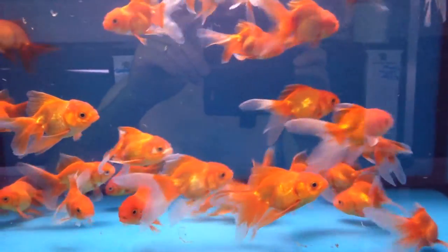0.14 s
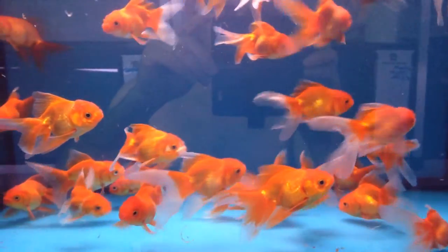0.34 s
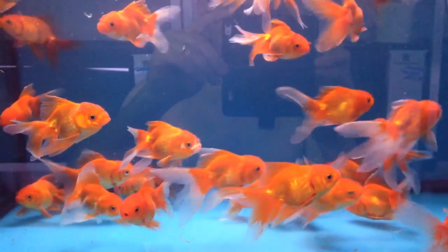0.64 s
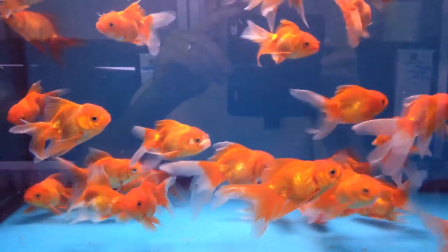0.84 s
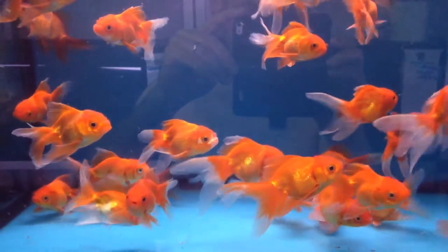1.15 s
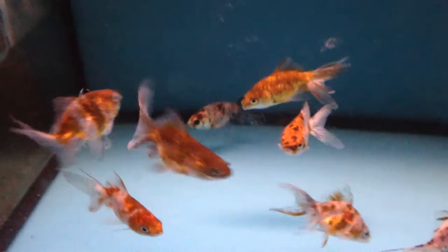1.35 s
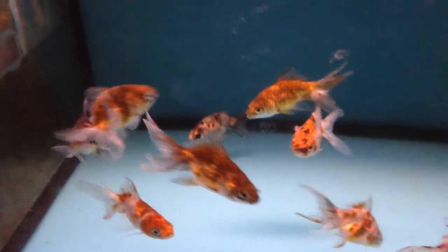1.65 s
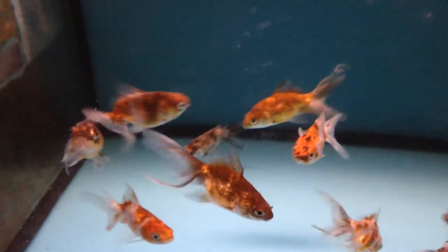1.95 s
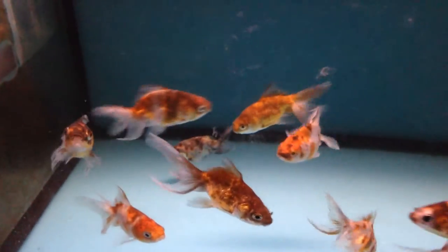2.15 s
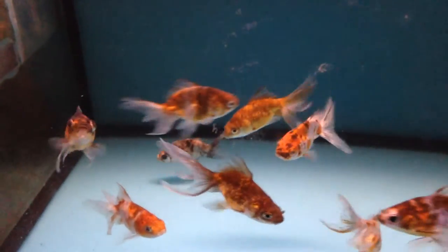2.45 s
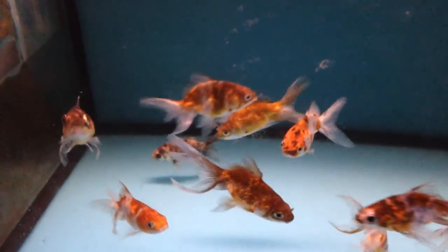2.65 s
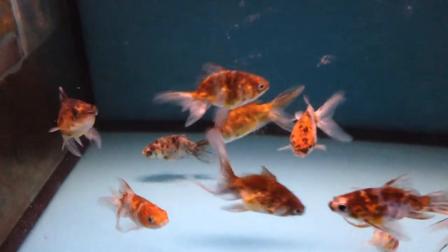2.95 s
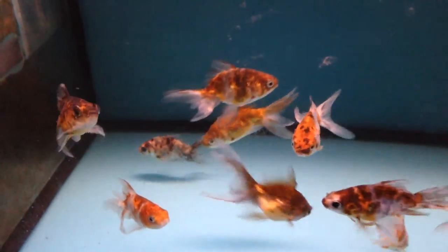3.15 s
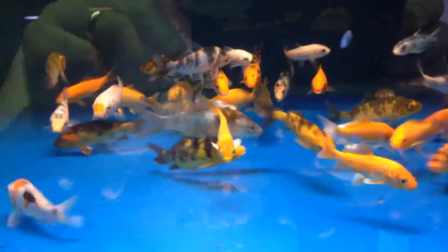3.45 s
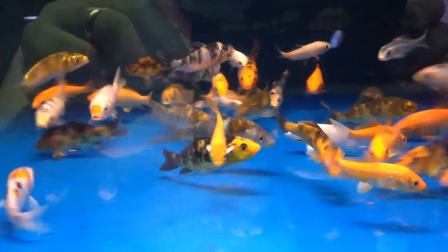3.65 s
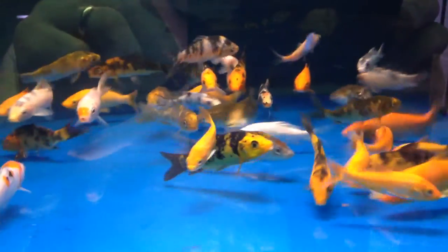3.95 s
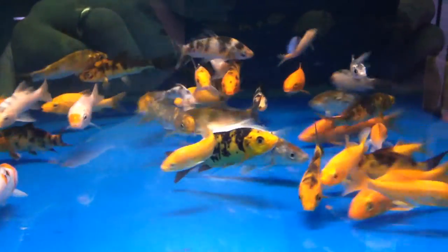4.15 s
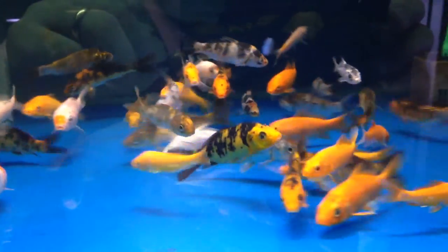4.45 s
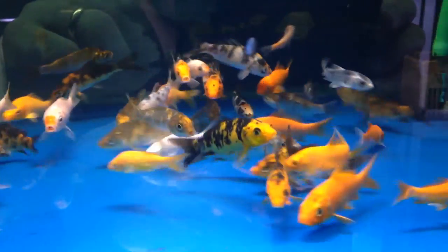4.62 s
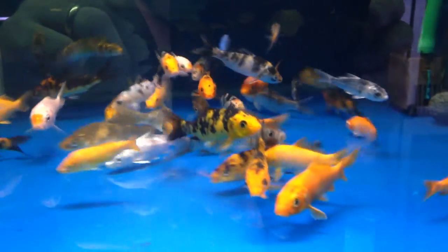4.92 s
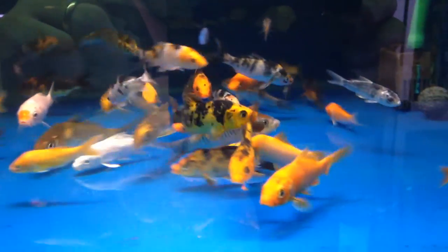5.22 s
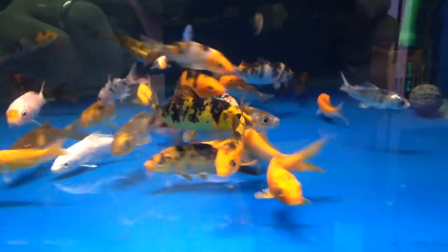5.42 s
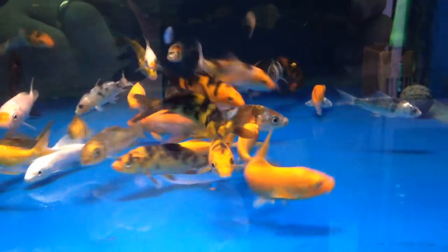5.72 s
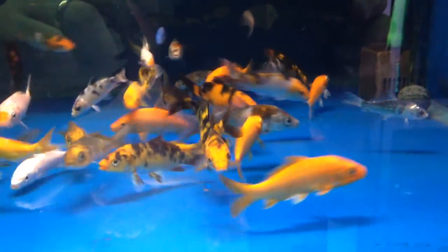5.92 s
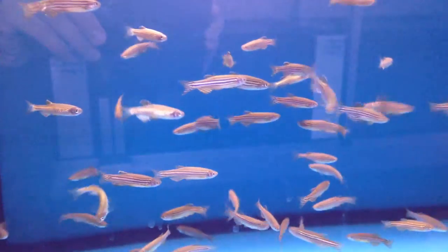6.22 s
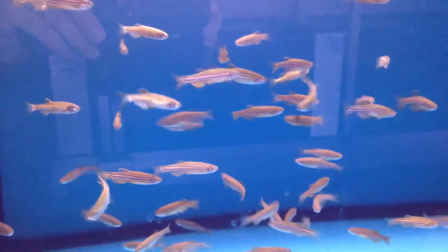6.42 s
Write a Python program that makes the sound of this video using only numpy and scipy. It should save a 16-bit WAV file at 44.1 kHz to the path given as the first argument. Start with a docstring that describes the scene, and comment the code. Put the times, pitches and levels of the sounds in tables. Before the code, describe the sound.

Steady electric hum of aquarium air pumps over rushing, gurgling, bubbling water, interrupted by three tiny silent gaps as the tank changes.

```python
"""Mains-driven air pumps hum at multiples of about 50 Hz, as sums of cosines, at four fish tanks.
The microphone listens to each tank in turn, with a short silence between them.
Behind the hum lie the wash of aerated water (coloured noise), gurgling bubbles and fizz (short
ringing tones), spray ticks and squeaks (filtered clicks and noise), and two outlet pipes (resonant
noise). At the third tank there is also a low wavering rumble of narrow noise."""
import sys
import numpy as np
from scipy import signal
from scipy.fft import rfft, irfft, next_fast_len
from scipy.io import wavfile
from scipy.ndimage import uniform_filter1d

SR = 44100
rng = np.random.default_rng(int(sys.argv[2]) if len(sys.argv) > 2 else 0)


def wrap_up_sound(samples):
    """Save the sound to the file named by the first command line argument, as 16-bit audio."""
    columns = np.atleast_2d(samples).T
    # keep every value between -1 and 1, then stretch to whole-number steps
    tamed = np.clip(columns, -1, 1)
    steps = np.round(tamed * 32767).astype(np.int16)
    wavfile.write(sys.argv[1], SR, steps)


N = 289911

# The tanks in listening order: start_s, end_s, mains_hz, stroke_delay_s, push_or_pull (+1 or -1)
TANK_VISITS = [(0, 1.328, 49.99, .002, 1), (1.3758, 3.4301, 50.0, 0, -1),
               (3.478, 5.9993, 50.006, .0179, -1), (6.0472, 6.6, 50.01, .0155, -1)]
# Pump harmonics, one list a tank: mains_multiple, level_db (rms)
PUMP_HARMONICS = [
    [(1, -67), (2, -50), (3, -57), (4, -49), (5, -55), (6, -56), (7, -68), (8, -61), (9, -75), (10, -73),
     (11, -62), (12, -72), (13, -70), (14, -68), (15, -70), (16, -70), (17, -68), (18, -67), (20, -72),
     (26, -64), (31, -73), (34, -72), (35, -68), (38, -71)],
    [(1, -68), (2, -47), (3, -53), (4, -55), (5, -56), (6, -60), (7, -65), (8, -68), (9, -64), (10, -69),
     (12, -73), (13, -72), (14, -75), (15, -69), (18, -65), (19, -72), (20, -73), (22, -71), (24, -71),
     (26, -67), (32, -75), (33, -71), (36, -71), (37, -74)],
    [(1, -67), (2, -64), (3, -55), (4, -54), (5, -55), (6, -58), (7, -72), (8, -64), (9, -69), (10, -56),
     (11, -71), (12, -71), (14, -72), (15, -70), (18, -72), (20, -62), (22, -70), (24, -71), (28, -73),
     (31, -73), (35, -71)],
    [(1, -69), (2, -52), (4, -56), (5, -63), (6, -53), (8, -62), (9, -62), (13, -67), (18, -66), (22, -67)],
]
# Spectrum of the wash of water and air, one list a tank: frequency_hz, density_db_per_hz
WASH_SPECTRA = [
    [(22, -95), (43, -84), (95, -82), (180, -78), (350, -84.5), (580, -86), (780, -81), (1500, -80.5),
     (2500, -83.5), (4200, -92.5), (6300, -100), (8500, -100), (12000, -103), (15000, -106)],
    [(22, -88), (43, -87), (80, -82), (150, -78), (350, -82.5), (600, -84.5), (800, -82), (1500, -82),
     (2500, -84), (4200, -94), (6300, -101), (8500, -104), (12000, -108), (15000, -111)],
    [(25, -100), (55, -74.5), (100, -85.5), (170, -77.5), (350, -83), (650, -86), (820, -81.5), (1500, -81),
     (2700, -84.5), (4600, -94.5), (5400, -96.5), (8500, -102), (12000, -104), (15000, -108)],
    [(22, -99), (43, -82), (95, -83), (190, -79), (400, -82.5), (580, -85), (800, -80.5), (1500, -81),
     (2500, -83.5), (4200, -93), (6300, -99), (8500, -101), (12000, -104), (15000, -109)],
]
# Course of the low rumble: time_s, level_db (rms), centre_hz
RUMBLE_COURSE = [(3.49, -58, 73.0), (3.59, -54.5, 76), (4.5, -61, 77), (4.62, -74, 71.4), (4.71, -54, 74),
                 (4.92, -55, 72.5), (5.18, -55, 81.5), (5.49, -55, 70.6), (5.64, -44, 74.8),
                 (5.69, -55, 74.6), (5.79, -50, 80.1), (5.99, -48, 80.1)]
# Spray ticks: start_s, snap_peak_db, low_edge_hz, high_edge_hz
SPRAY_TICKS = [(.1395, -41, 4600, 8660), (.4202, -45, 8000, 10500), (.511, -49, 8000, 9500),
               (.6008, -40, 7500, 10700), (.74, -51, 8000, 9200), (.795, -45, 12000, 15200),
               (.8742, -43, 7800, 15200), (.965, -50, 8000, 13000), (1.268, -52, 11500, 13000),
               (1.929, -48, 9000, 11000), (2.075, -54, 7600, 8800), (2.097, -54, 9500, 15200),
               (2.651, -52, 8000, 11000), (3.3865, -49, 7000, 11000), (3.75, -51, 9500, 11500),
               (4.782, -52, 8500, 11500), (5.337, -49, 9500, 13000), (5.368, -51, 9500, 13000)]
# Squeaky hisses: start_s, length_s, level_db (rms before the fades), start_hz, end_hz, width_hz
SPRAY_SQUEAKS = [(4.102, .035, -61.5, 8700, 7900, 800), (4.147, 0.041, -59, 7300, 7500, 700)]
# Near bubbles: start_s, peak_db (before the rise and decay), pitch_hz
NEAR_BUBBLES = [(1.876, -41, 1300), (2.04, -41, 1350), (2.095, -42, 2366), (2.445, -44, 1330),
                (2.652, -36, 1330), (3.011, -41, 1350), (3.391, -41, 1370), (3.71, -48, 2770),
                (4.346, -41.5, 2850), (4.523, -44, 2510), (4.572, -45, 1985), (5.093, -42, 2355),
                (6.412, -40, 1325)]
# Gurgling bubbles before the room tail: lowest_hz, highest_hz, rate_per_s, level_db (rms)
GURGLE = (650, 3385, 503, -58.5)
# Fizz of tiny bubbles before the room tail: lowest_hz, highest_hz, rate_per_s, level_db (rms)
FIZZ_BUBBLES = (6000, 14500, 16, -95)
# Air columns of the outlet pipes: resonance_hz, width_hz, level_db (rms)
OUTLET_PIPES = [(1325, 40, -63), (1485, 30, -65)]

EDGE_HZ = 15270  # upper limit of the recorded band
HUM_LAG_S, HUM_LAG_LASTS_S = .0032, .03  # after each silence the hum lags, then jumps ahead
PUFF_DB, PUFF_T60_CYCLES = -11, 390  # puff relative to its snap; decay in cycles of the low edge
GULP_RISE_S, GULP_T60_S = 0.0015, 0.094


def amp(db):
    """Level law: 20 dB is a factor of ten in amplitude."""
    return 10 ** (np.asarray(db) / 20)


def evened(x):
    """Normalization: division by the root mean square gives rms 1."""
    return x / np.sqrt(np.mean(x ** 2) + 1e-20)


def add(mix, s, sound):
    """Superposition: a sound is summed into the mix from time s, in place."""
    part = mix[round(s * SR):][:len(sound)]
    part += sound[:len(part)]


def resonate(x, hz, width):
    """Resonance by heterodyning: shift hz down to zero, smooth, and shift back, at gain 1."""
    turn = np.exp(2j * np.pi * np.cumsum(hz * np.ones(len(x))) / SR)
    pole = np.exp(-np.pi * width / SR)
    smoothed = signal.lfilter([1 - pole], [1, -pole], x / turn + 1e-18)
    return 2 * (turn * smoothed).real


def whistle(count, hz, width):
    """Resonances in cascade: noise through two equal ones is a steep narrow band, rms 1."""
    once = resonate(rng.standard_normal(count), hz, width)
    return evened(resonate(once, hz, width))


def wash(count, spectrum, patchy_db=1.23, flicker_db=0.56, ripple_db=1.5):
    """Coloured noise: a shaped spectrum with drifting patches and a flicker shared by the treble."""
    hz, t, z = signal.stft(rng.standard_normal(count + 2048), SR, nperseg=1024, noverlap=768)
    patches = uniform_filter1d(rng.standard_normal(z.shape), size=10, axis=0)  # over frequency
    patches = evened(uniform_filter1d(patches, size=8, axis=1))  # over time
    flicker = evened(uniform_filter1d(rng.standard_normal(len(t)), size=4))
    flicker = flicker * np.clip(hz / 6000, 0, 1)[:, None]
    varied = z * amp(patchy_db * patches + flicker_db * flicker)
    white = signal.istft(varied, SR, nperseg=1024, noverlap=768)[1]

    size = next_fast_len(len(white))
    bins = np.fft.rfftfreq(size, 1 / SR)
    f, db = np.transpose(spectrum)
    colour_db = np.interp(np.log(bins + 1), np.log(f), db, left=-110)
    # standing waves of the shop: narrow fixed peaks and dips that fade out in the treble
    ripple = evened(uniform_filter1d(rng.standard_normal(len(bins)), size=round(30 * size / SR)))
    colour_db = colour_db + ripple_db * ripple / (1 + (bins / 2500) ** 2)
    # sqrt(SR / 2) brings unit white noise to 0 dB per Hz
    coloured = irfft(rfft(white, size) * np.sqrt(SR / 2) * amp(colour_db), size)
    return coloured[1024:1024 + count]


def rumble():
    """Narrow-band noise: one low resonance wavers in pitch and swells and sinks in level."""
    s, db, hz = np.transpose(RUMBLE_COURSE)
    t, out = np.arange(s[0], s[-1], 1 / SR), np.zeros(N)
    sound = whistle(len(t), np.interp(t, s, hz), 9)
    steadied = sound / np.sqrt(uniform_filter1d(sound ** 2, size=3000) + .1)
    add(out, s[0], evened(steadied) * amp(np.interp(t, s, db)))
    return out


def outlet_pipes():
    """Air-column resonance: each pipe selects a narrow band from noise."""
    return sum(amp(db) * whistle(N, hz, width) for hz, width, db in OUTLET_PIPES)


def room(x, t60=0.1, wet_db=-5):
    """Reverberation: sparse echoes of random sign die away by 60 dB in t60 seconds."""
    count = SR // 3
    taps = rng.choice([-1., 1.], count) * (rng.random(count) < 3000 / SR)  # about 3000 per s
    taps = taps * amp(-60 * np.arange(count) / SR / t60)
    taps[:150] = 0  # gap before the first echo
    tail = signal.oaconvolve(x, taps / np.linalg.norm(taps))[:N]
    return x + amp(wet_db) * tail


def bubbles(low_hz, high_hz, per_s, db, cycles, spread_db):
    """Bubble oscillation: each rings a few cycles and rises in pitch as it nears the surface."""
    sizes = amp(spread_db * np.minimum(rng.exponential(1, N), 5))
    strikes = sizes * (rng.random(N) < per_s / SR)
    kind, out = rng.integers(0, 30, N), np.zeros(N)
    for k, hz in enumerate(np.geomspace(low_hz, high_hz, 30)):
        turns = np.arange(2000) * hz / SR
        envelope = (1 - np.exp(-turns)) * np.exp(-turns / cycles)
        ring = envelope * np.sin(2 * np.pi * turns * (1 + 0.00393 * turns))
        out += signal.oaconvolve(strikes * (kind == k), ring / np.linalg.norm(ring))[:N]
    return amp(db) * evened(out)


def tick(db, low_hz, high_hz):
    """Impulse response: a band-limited snap, with a softer puff of spray that lasts longer if low."""
    t = np.arange(SR // 8) / SR
    band = signal.butter(3, [low_hz, min(high_hz, EDGE_HZ)], "band", fs=SR, output="sos")
    snap = signal.sosfilt(band, 1. * (t == 0))
    noise = evened(signal.sosfilt(band, rng.standard_normal(len(t))))
    puff = noise * amp(PUFF_DB - 60 * t * low_hz / PUFF_T60_CYCLES)
    return amp(db) * (snap / abs(snap).max() + puff)


def squeak(length, db, start_hz, end_hz, width):
    """Gliding resonance: a puff of narrow noise slides in pitch between two fades."""
    count = round(length * SR)
    glide_hz = np.linspace(start_hz, end_hz, count)
    return amp(db) * signal.windows.tukey(count, .6) * whistle(count, glide_hz, width)


def splashes():
    """Superposition of transients: the ticks and squeaks of spray at their times."""
    out = np.zeros(N)
    for s, *settings in SPRAY_TICKS:
        add(out, s, tick(*settings))
    for s, *settings in SPRAY_SQUEAKS:
        add(out, s, squeak(*settings))
    return out


def gulps():
    """Damped oscillation: each near bubble is a short dying sine of steady pitch."""
    out, t = np.zeros(N), np.arange(SR // 10) / SR
    rise = 1 - np.exp(-t / GULP_RISE_S)
    for s, db, hz in NEAR_BUBBLES:
        add(out, s, amp(db - 60 * t / GULP_T60_S) * rise * np.sin(2 * np.pi * hz * t))
    return out


def hum(t, mains, delay, sign, harmonics):
    """Fourier series of one diaphragm stroke a mains cycle: low orders align, high ones scatter."""
    out = np.zeros(len(t))
    for k, db in harmonics:
        scatter = rng.standard_normal() * (.7 if k < 8 else 3)  # phase, radians
        wave = np.cos(2 * np.pi * k * mains * (t - delay) + scatter)
        out += sign * np.sqrt(2) * amp(db) * wave
    return out


def scene():
    """Superposition: shared shop sounds plus each tank's hum and wash, with silence between tanks."""
    pipes = outlet_pipes()
    water = bubbles(*GURGLE, cycles=8., spread_db=3.3)
    water = water + bubbles(*FIZZ_BUBBLES, cycles=2.5, spread_db=2.5)
    shop = room(water + splashes()) + gulps() + pipes + rumble()
    out = np.zeros(N)
    for visit, harmonics, spectrum in zip(TANK_VISITS, PUMP_HARMONICS, WASH_SPECTRA):
        start, end, mains, delay, sign = visit
        at = np.arange(round(start * SR), min(round(end * SR), N))
        t = at / SR
        lagging = (start > 0) * (t < start + HUM_LAG_LASTS_S)
        pump = hum(t - HUM_LAG_S * lagging, mains, delay, sign, harmonics)
        out[at] = shop[at] + pump + wash(len(at), spectrum)
    return out[None]


def record(dry):
    """Band limitation: a linear-phase low-pass filter removes what lies above the edge."""
    lowpass = signal.firwin(1023, EDGE_HZ, window=("kaiser", 9), fs=SR)
    return signal.oaconvolve(dry, lowpass[None], "same")


dry = scene()
out = record(dry)
wrap_up_sound(out)
```